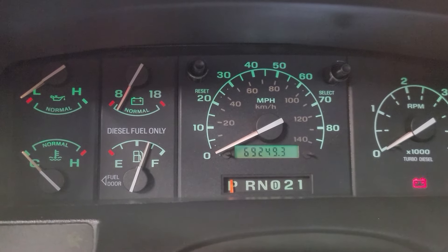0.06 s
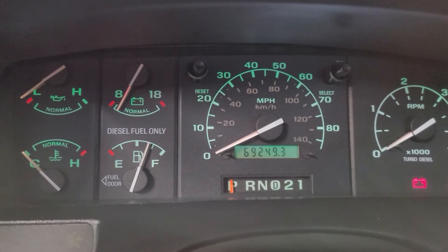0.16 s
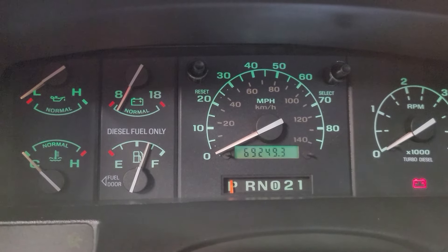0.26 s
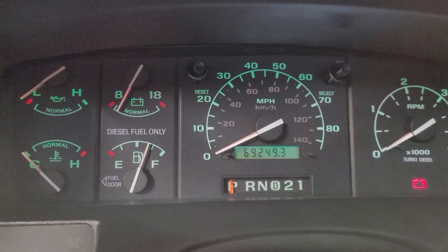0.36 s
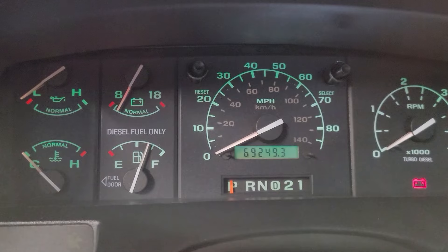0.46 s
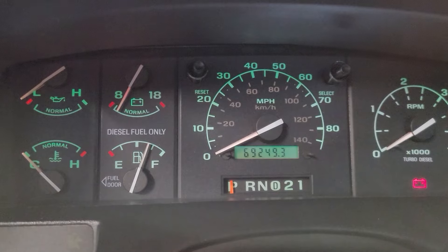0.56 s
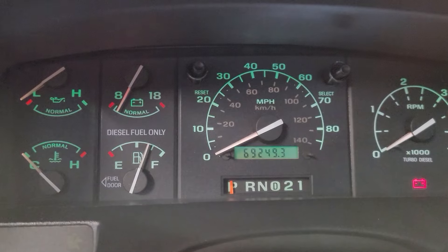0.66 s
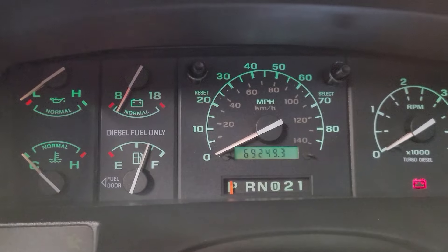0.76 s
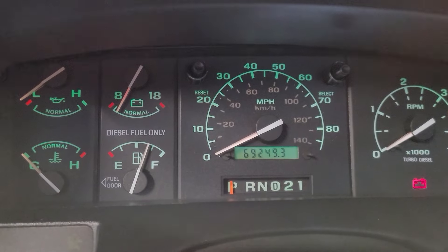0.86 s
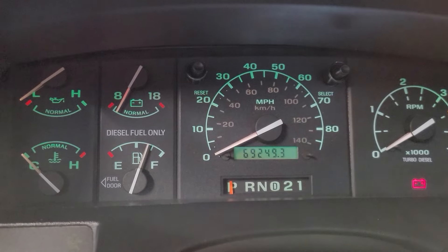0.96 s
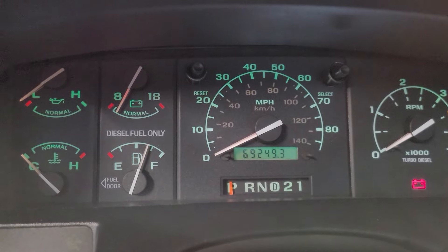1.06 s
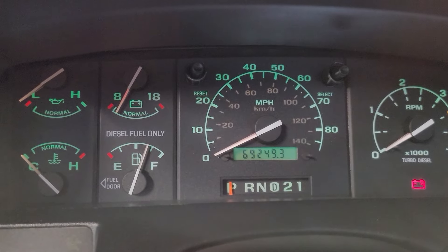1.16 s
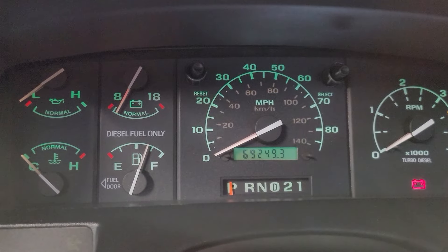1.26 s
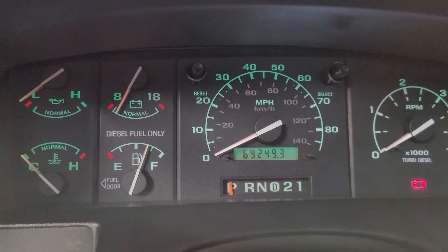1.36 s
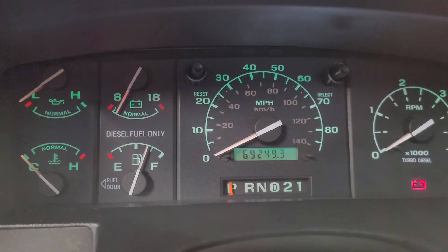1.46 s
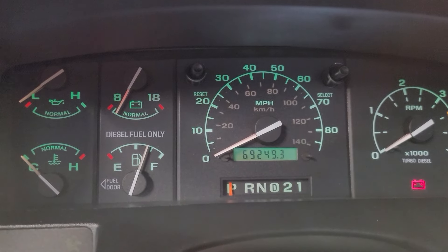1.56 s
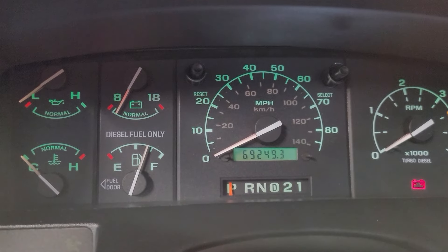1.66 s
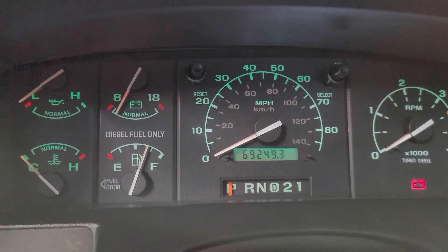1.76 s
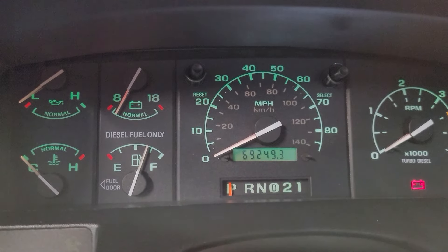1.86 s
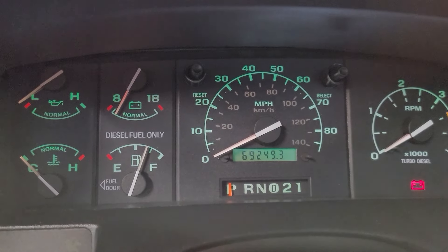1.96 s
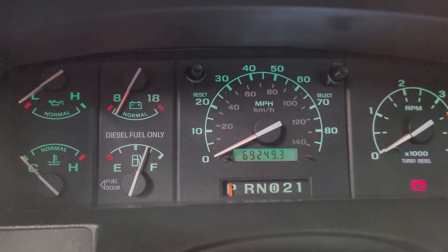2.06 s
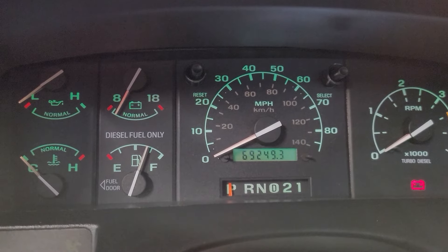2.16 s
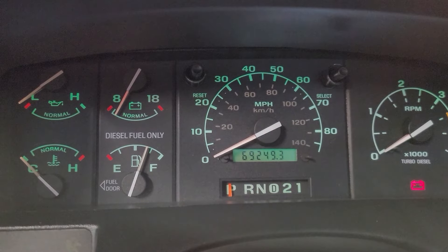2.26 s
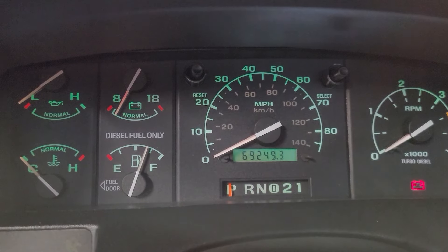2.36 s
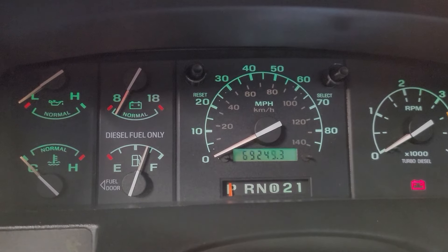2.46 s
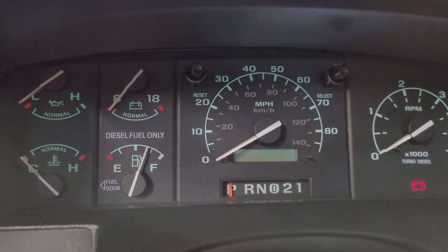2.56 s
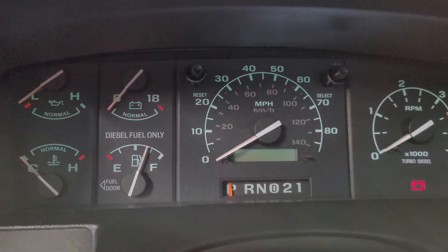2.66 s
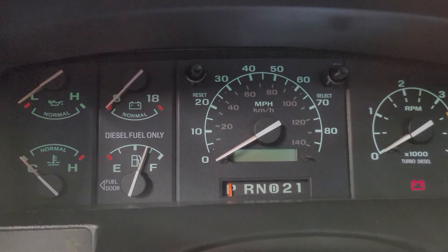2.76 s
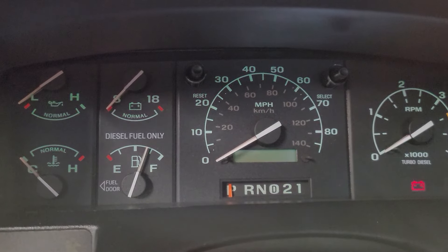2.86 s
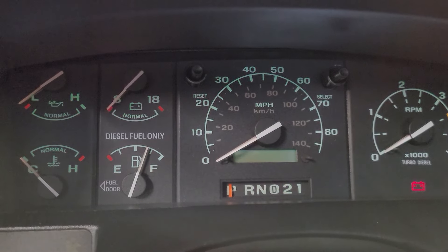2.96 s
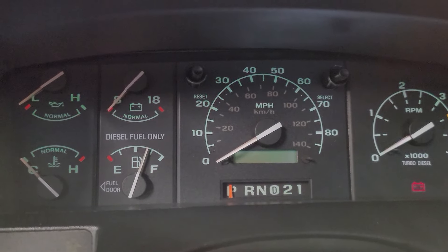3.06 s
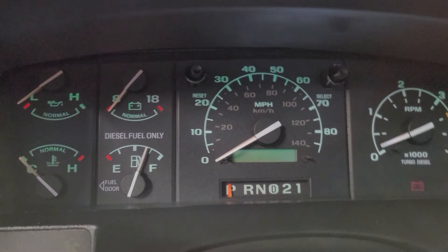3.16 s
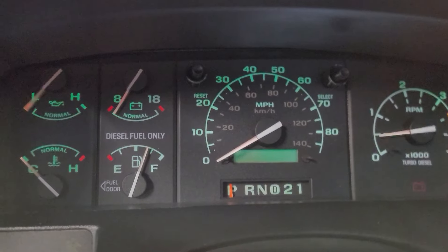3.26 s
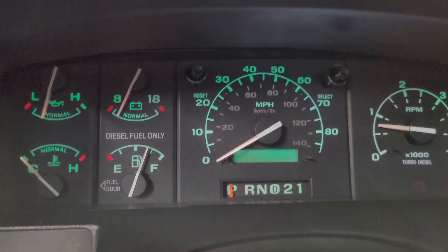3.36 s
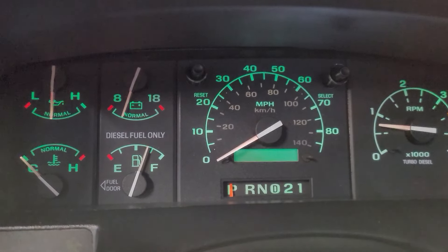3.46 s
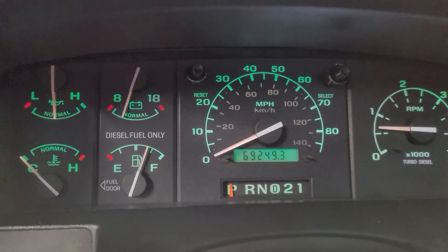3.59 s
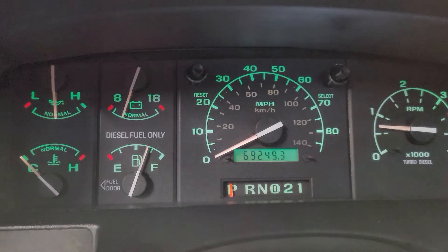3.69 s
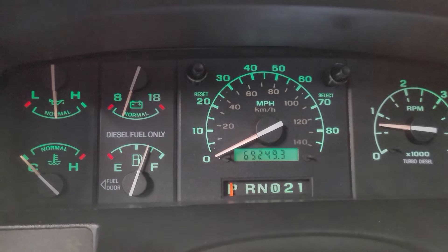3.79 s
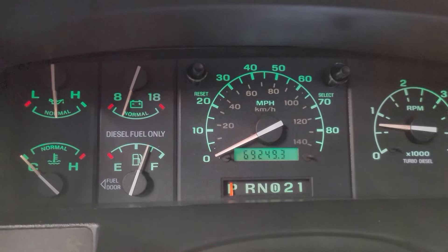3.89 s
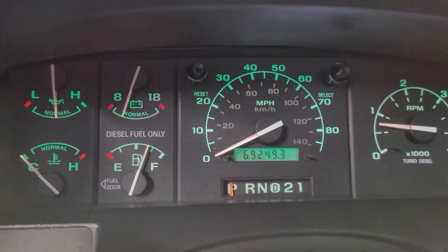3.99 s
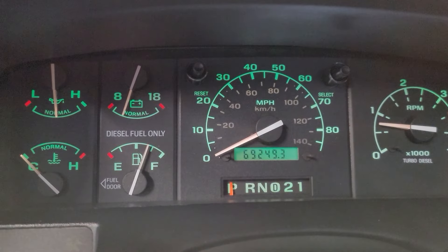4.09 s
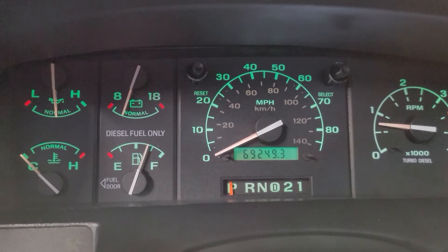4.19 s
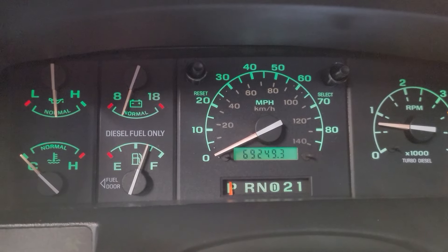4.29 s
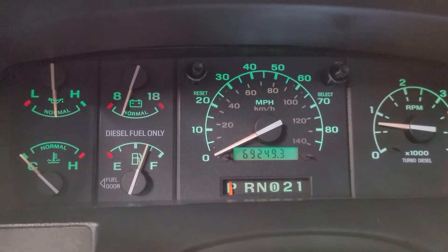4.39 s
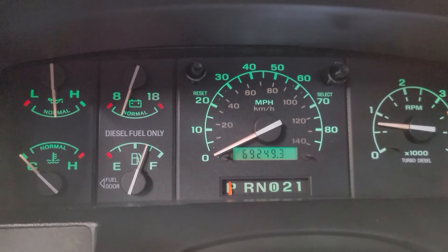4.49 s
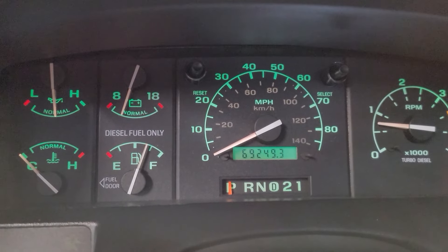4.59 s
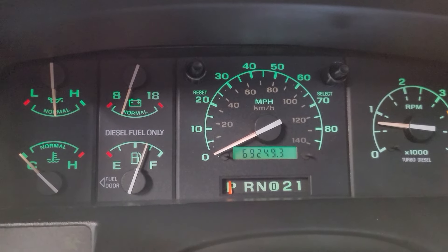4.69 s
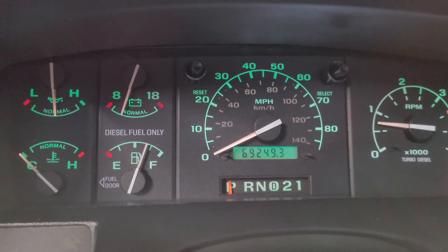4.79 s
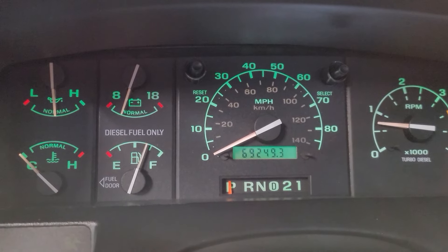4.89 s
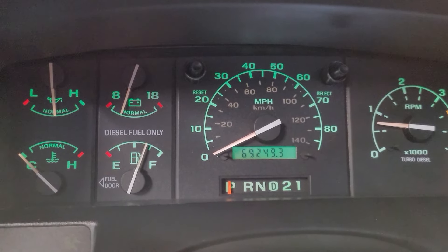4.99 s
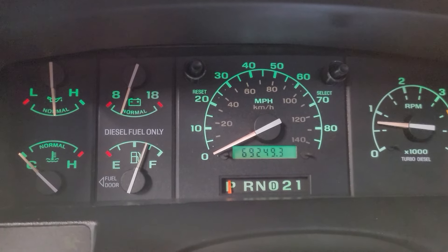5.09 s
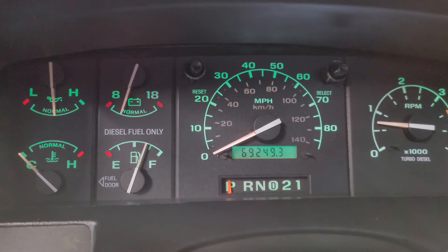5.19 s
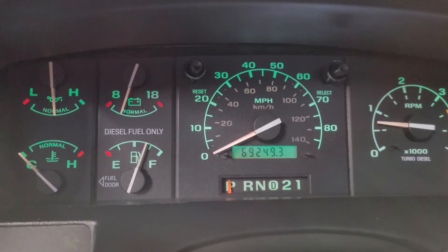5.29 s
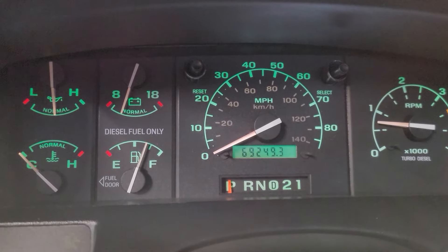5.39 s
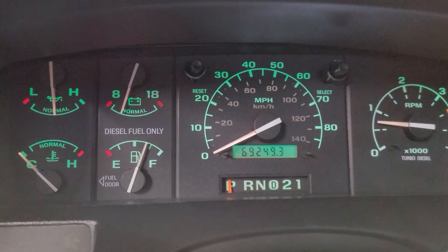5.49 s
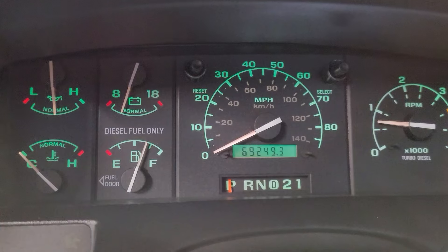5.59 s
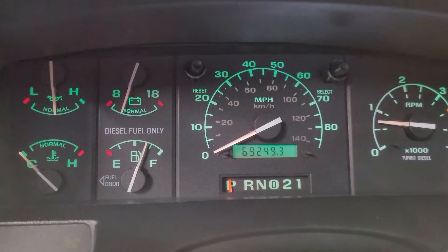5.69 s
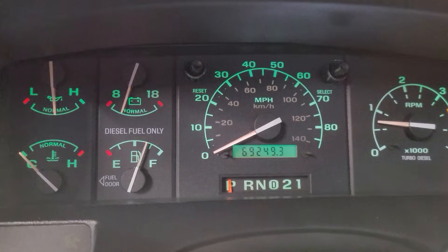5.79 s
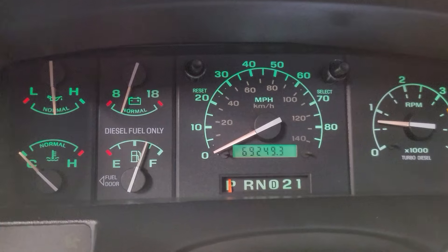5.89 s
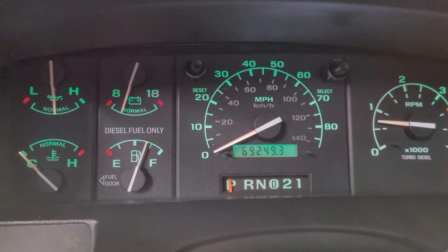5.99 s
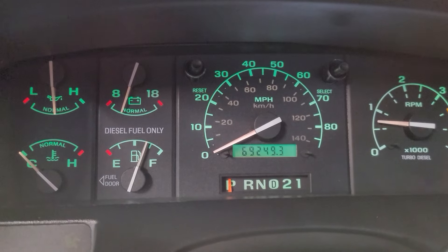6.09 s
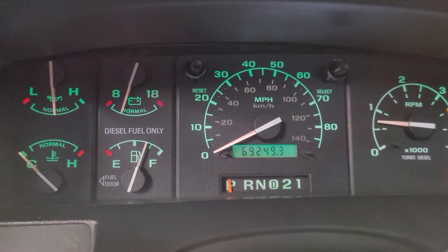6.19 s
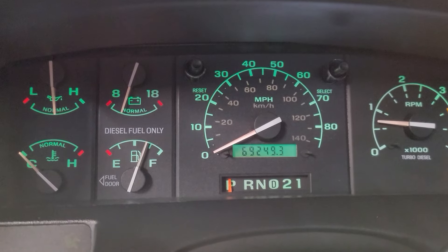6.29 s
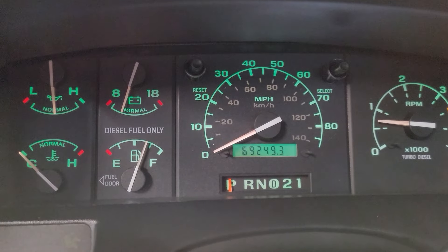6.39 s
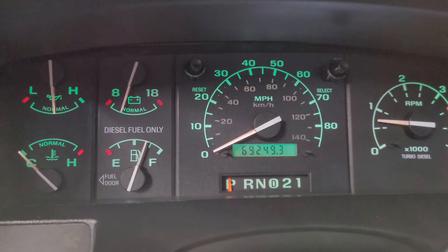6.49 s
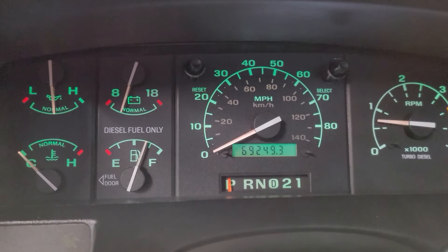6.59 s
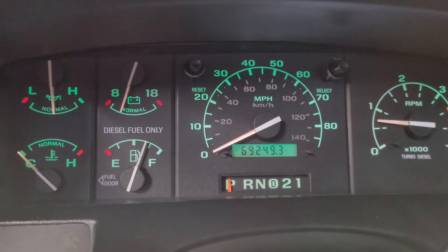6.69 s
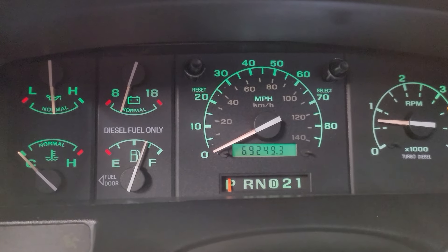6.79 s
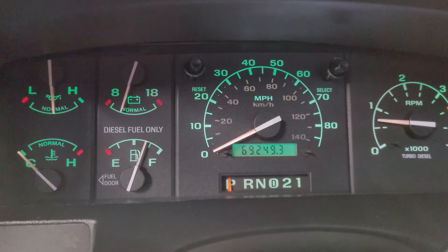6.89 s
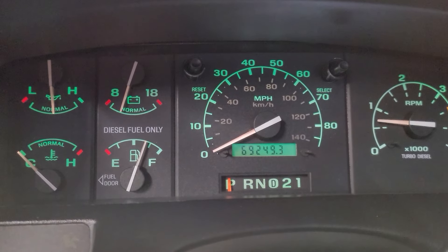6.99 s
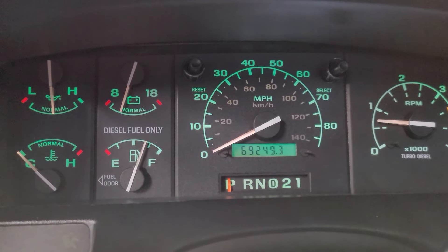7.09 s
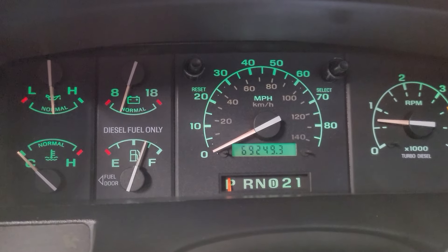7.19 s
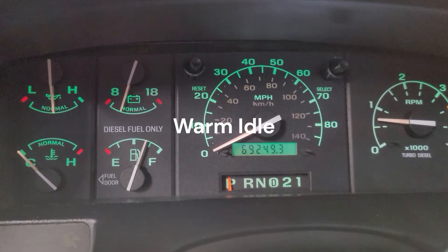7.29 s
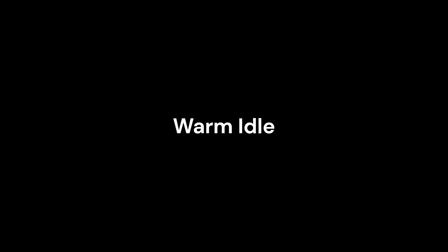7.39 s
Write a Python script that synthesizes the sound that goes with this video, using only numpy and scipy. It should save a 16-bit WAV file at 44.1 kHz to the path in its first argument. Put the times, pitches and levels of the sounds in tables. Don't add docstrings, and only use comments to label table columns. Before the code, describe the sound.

Keys jingle in a quiet truck cab, the ignition clicks, a starter groans briefly, and a big diesel catches, flares and settles into a clattering idle.

```python
import sys
import numpy as np
from scipy import signal
from scipy.fft import rfft, irfft
from scipy.io import wavfile
from scipy.ndimage import uniform_filter1d

SR = 44100
rng = np.random.default_rng(int(sys.argv[2]) if len(sys.argv) > 2 else 0)


def gain_from_db(level_db):
    decades = np.asarray(level_db, float) / 20
    return 10 ** decades


def generate_wav(signal):
    frames = np.transpose(np.atleast_2d(signal))
    scaled = np.clip(frames, -1, 1) * 32767
    pcm = np.round(scaled).astype(np.int16)
    wavfile.write(sys.argv[1], SR, pcm)


N = 328545
CYLINDERS = 8
# (frequency [Hz], correlation [-1..1])
HUSH_SAME = [(60, 0.95), (130, 1), (290, 0.42), (640, 0.62), (1410, -0.28), (3100, -0.38), (6820, 0.35),
             (15000, -0.97)]


def read(points, hz):
    f, value = np.transpose(points)
    return np.interp(np.log(hz + 1), np.log(f + 1), value)


def evened(x, t0=4.5, t1=7.0):
    return x / np.sqrt(np.mean(x[..., int(t0 * SR):int(t1 * SR)] ** 2))


def add(mix, s, sound, lean_db):
    part = mix[:, round(s * SR):][:, :sound.shape[-1]]
    sides = gain_from_db(lean_db / 2 * np.array([[1], [-1]]))
    part += (sound * sides)[..., :part.shape[1]]


def noise(spectrum, same, patchy_db, size, peaks=()):
    # (frequency [Hz], left minus right [dB])
    tilt = [(60, -1), (150, 5), (380, 1), (950, 3), (2380, 2.5), (5980, 0.5), (15000, -2.5)]
    frames, hz = 4 * N // size + 5, np.fft.rfftfreq(size, 1 / SR)
    a, b, c, d, patches = rng.standard_normal((frames, len(hz), 5)).T
    patches = uniform_filter1d(uniform_filter1d(patches, size=6, axis=0), size=8, axis=1)
    like = np.clip(read(same, hz), -1, 1)[:, None]
    left = a + 1j * b
    right = like * left + np.sqrt(1 - like ** 2) * (c + 1j * d)
    lean_db = read(tilt, hz)[:, None] / 2 * np.array([1, -1])[:, None, None]
    colour_db = read(spectrum, hz)
    for f, width, db in peaks:
        colour_db = colour_db + db / (1 + (2 * (hz - f) / width) ** 2)
    z = np.array([left, right]) * gain_from_db(colour_db[:, None] + lean_db + patchy_db * patches / patches.std())
    return evened(signal.istft(z, nperseg=size, noverlap=3 * size // 4)[1][:, :N])


def crank():
    # (time [s], firing rate [Hz])
    run_up = [
        (2.46, 3.3),
        (2.55, 16.2),
        (3.028, 16.4),
        (3.102, 39),
        (3.201, 41),
        (3.303, 58),
        (3.452, 57),
        (3.599, 52),
    ]
    # (time [s], firing rate [Hz])
    idling = [(3.72, 49.86), (4.3, 49.43), (4.9, 48.75), (5.5, 48.08), (6.1, 47.77), (6.7, 47.34),
              (7.35, 46.57)]
    cycle_start_s = 3.828
    rate = np.interp(np.arange(N) / SR, *np.transpose(run_up + idling))
    firings = np.cumsum(rate) / SR
    return rate, firings - firings[round(cycle_start_s * SR)]


def orders(rate, firings, uneven, step=32):
    # (multiple of the four-stroke cycle [count], level [dB])
    shaft = [(3, -47), (4, -54), (6, -50), (7, -50), (8, -26), (9, -49), (10, -44), (11, -44), (12, -48),
             (14, -40), (15, -47), (16, -34), (21, -51), (23, -49), (24, -46), (26, -46), (27, -47),
             (28, -47), (30, -51), (31, -50), (32, -43), (34, -50), (37, -53), (38, -47), (39, -47)]
    cab_hz, cab_width_hz, cab_db = 187.7, 3.97, 11
    turns = firings[::step] / CYLINDERS
    out = np.zeros((2, N // step + 1))
    for k, db in shaft:
        wobble = uniform_filter1d(rng.standard_normal((2, len(turns))), size=260, axis=1)
        wobble = (wobble[0] + 1j * wobble[1]) / wobble.std()
        off = (k * rate[::step] / CYLINDERS - cab_hz) / cab_width_hz
        share = uneven[::step] * (.16 if k % CYLINDERS == 0 else .9)
        waver = (1 + share * wobble) / np.sqrt(1 + 2 * share ** 2)
        tone = waver * np.exp(2j * np.pi * (k * turns + rng.random()))
        out[int(k > 11)] += gain_from_db(db + cab_db / (1 + off ** 2)) * tone.real
    boom, body = signal.resample_poly(out, step, 1, axis=1)[:, :N]
    return evened(boom), evened(body)


def knocks(firings, scatter_db=1.3, jitter_s=.0003, detune=.005, spread=.09):
    # (crank position [firings], panel frequency [Hz], level [dB],
    # left minus right [dB])
    blows = [(0.0, 1270, -48.5, 13), (.15, 1380, -52, 8), (0.1875, 624, -49, 4), (0.8125, 1141, -51, 7),
             (0.875, 1485, -53, 2), (1.75, 500, -43.5, -1), (2.0, 1507, -55, 3), (2.125, 990, -50, 7),
             (2.8125, 490, -44, 0), (3.125, 1916, -57, -2), (3.1, 2433, -55, 3), (3.1875, 947, -53, 1),
             (3.75, 1550, -56, 3), (4.4375, 2971, -58, 8), (4.85, 1250, -45, 12), (5.3, 970, -48, 8),
             (4.625, 2196, -57, 0), (5.0625, 2734, -61, -2), (5.125, 1141, -45.5, 7), (5.6875, 473, -49, 0),
             (5.9375, 624, -48, 4), (6.375, 1981, -64, 6), (6.8125, 1162, -49, 6), (6.8125, 1593, -52, 10),
             (1.2, 400, -48, 1),
        (3.3, 610, -47, 2),
             (.8, 1700, -55, 4), (1.5, 900, -52, 4), (1.75, 2700, -59, 2), (1.8, 1760, -55, 3),
               (2.85, 2420, -58, 3), (2.95, 1690, -55, 3), (3.8, 1950, -57, 0), (4.65, 1290, -48, 10),
               (6.05, 1330, -53, 8), (7.4, 2850, -60, 3)]
    out, t = np.zeros((2, N)), np.arange(1800) / SR
    cycles = np.arange(-4, 22) * CYLINDERS
    for place, hz, db, lean_db in blows:
        chance = rng.standard_normal((len(cycles), 3))
        peak_s = .0036 + 1.5 / hz
        times = np.interp(cycles + place, firings, np.arange(N) / SR)
        times = times - 1.312 * peak_s + jitter_s * chance[:, 0]
        shape = t / peak_s * np.exp(1 - t / peak_s)
        sides = rng.uniform(-1.52, 1.0, (2, 1))
        for s, size, tune in zip(times, chance[:, 1], chance[:, 2]):
            ring = np.sin(2 * np.pi * hz * (1 + detune * tune) * t + sides)
            for way in (-1, 1.4):
                ring += .3 * np.sin(2 * np.pi * hz * (1 + way * spread) * t + way * size - sides)
            add(out, s, gain_from_db(db + scatter_db * size) * shape * ring, lean_db)
    return evened(out)


def repeating(hiss, firings, size=7400):
    out = np.zeros_like(hiss)
    for shift in (0, .5):
        place = (firings / CYLINDERS + shift) % 1
        out += np.sin(np.pi * place) * hiss[:, (size * (place + 4 * shift + 1)).astype(int)]
    return out


def engine():
    # (time [s], effort [dB])
    effort = [(2.452, -24), (2.464, 1.5), (2.512, 1.5), (2.654, -4.5), (2.786, -3), (2.944, -5.5),
              (2.986, 0), (3.045, -9.5), (3.068, 4), (3.244, 8), (3.316, 5.5), (3.392, 1.5), (3.456, -3),
              (3.658, 4.5), (3.734, -2), (3.85, 0.3), (4.1, -1.17), (7.3, -1.5)]
    # (firing rate [Hz], boom [dB])
    boom_by_speed = [(4, -46), (18, -12.5), (40, -2), (46.6, -8.5), (47.8, -3.5), (49.4, 0.5), (52, -6.5),
                     (58, 0.5)]
    # (time [s], half-length [s], boom [dB], body [dB])
    lurches = [(2.52, 0.012, -5, 11), (2.6, 0.06, 5.5, 7.5), (2.792, 0.055, 3, -10), (2.897, 0.023, -4, 0),
               (2.953, 0.022, 8.5, 11), (3.04, 0.031, 6, 2), (3.064, 0.018, -8, 6), (3.18, 0.043, 5, 0.5),
               (3.241, 0.016, 13.5, 0.5), (3.318, 0.043, 8.5, -3), (3.664, 0.031, -10.5, 1.5),
               (3.85, 0.018, -11, 2), (3.99, 0.023, 3.5, 2), (4.091, 0.023, -6.5, 1)]
    # (frequency [Hz], density [dB per Hz])
    rumble_colour = [(8.8, -24), (15, -21.5), (38, 3.5), (65, -6), (109, -5.5), (136, -3), (195, -7),
                     (270, -13), (312, -21), (386, -12), (420, -15), (550, -60.5), (920, -120)]
    roar_colour = [(150, -21.5), (250, -8.5), (307, -11), (446, -14), (501, -3.5), (654, -7), (741, -10),
                   (1260, -9.5), (2100, -29.5), (2730, -61.5), (4620, -120)]
    clatter_colour = [(880, -33.5), (1500, -2.5), (1840, -10.0), (2380, -6.5), (3110, -10.5), (4520, -15.5),
                      (5140, -25.5), (6710, -25.5), (8920, -39.5), (11200, -36.0), (15800, -37.5),
                      (16300, -78.5)]
    # (frequency [Hz], width [Hz], level [dB])
    trim = [(399, 12, 11), (501, 14, 12), (630, 20, 7), (970, 20, 8), (1137, 12, 13), (1655, 16, 6),
            (1590, 200, 3)]
    # (frequency [Hz], correlation [-1..1])
    likeness = [(60, 0.86), (130, 0.93), (290, 0.61), (640, 0.9), (1410, 0.096), (3100, 0.097),
                (6800, 0.051), (15000, 0.078)]
    # (frequency [Hz], phase lead [rad])
    port_lead = [(0, 0), (600, -.3), (1210, 2.8), (1980, 5.4), (4050, 12.5), (20000, 12.5)]

    t = np.arange(N) / SR
    effort_db = np.interp(t, *np.transpose(effort))
    rate, firings = crank()
    firing = np.clip((rate - 20) / 22, 0, 1)
    rock_db, heave_db = sum(np.outer(dbs, np.exp(-((t - s) / half) ** 2)) for s, half, *dbs in lurches)

    boom_db = -22 + 0.66 * effort_db + read(boom_by_speed, rate) + rock_db
    body_db = -30 + 0.53 * effort_db - 9 * (1 - firing) + heave_db
    knock_db = -38.5 + effort_db - 0.87 * (1 - firing)
    clatter_db = -53.5 + firing * effort_db + (1 - firing) * (1.5 + 0.51 * effort_db)

    uneven = 0.54 * (1 + 4 * np.clip((4.05 - t) / .45, 0, 1))
    boom, body = orders(rate, firings, uneven)
    settled = np.clip((t - 3.3) / 0.6, .25, 1) * firing
    shaken = np.clip((3.9 - t) / .5, 0, 1) * firing
    rumble = noise(rumble_colour, likeness, 1.2, size=4096)
    low = signal.sosfiltfilt(signal.butter(N=3, Wn=70, fs=SR, output="sos"), rumble)

    puffs = 1 + 0.047 * firing * np.cos(2 * np.pi * (firings - .1))
    puffs = puffs + 0.029 * np.cos(2 * np.pi * (firings / CYLINDERS - .2))
    luck = rng.standard_normal(400)[firings.astype(int) % 400]
    puffs = puffs * gain_from_db(.3 * firing * np.maximum(effort_db, 0) * uniform_filter1d(luck, size=150))
    grind = uniform_filter1d(rng.standard_normal(N), size=800)
    puffs = puffs * gain_from_db(1.3 * (1 - firing) * (grind / grind.std() - .4))

    out = gain_from_db(boom_db) * (firing * boom + (0.17 + 0.94 * (1 - firing)) * evened(low))
    out += gain_from_db(body_db) * (1.084 * firing * body + (0.5 + 0.47 * (1 - firing)) * evened(rumble - low))
    roar = noise(roar_colour, likeness, 0.7, size=4096, peaks=trim)
    locked = .22 * settled ** 2
    roar = np.sqrt(1 - locked) * roar + np.sqrt(locked) * repeating(roar, firings)
    out += gain_from_db(knock_db + .3) * (.7 * settled * knocks(firings) + .76 * puffs * roar)
    clatter = noise(clatter_colour, likeness, 1.2, size=512)
    treble = signal.butter(N=4, Wn=5200, btype="high", fs=SR, output="sos")
    fizz = signal.sosfilt(treble, clatter)
    out += gain_from_db(clatter_db + 5.5) * puffs * (clatter + 0.89 * shaken * fizz)
    out += gain_from_db(body_db) * .5 * shaken * evened(rumble - low)

    lead = np.interp(np.fft.rfftfreq(N, 1 / SR), *np.transpose(port_lead))
    out[0] = irfft(rfft(out[0]) * np.exp(1j * lead), N)
    return out * np.clip((t - effort[0][0]) / 0.0019, 0, 1)


def starter(chatter=.2, waver=.015):
    # (start [s], length [s], first pitch [Hz], last pitch [Hz], level [dB])
    groans = [(2.675, .13, 255, 205, -26), (2.79, .065, 362, 340, -35), (2.84, .08, 284, 229, -32.5),
              (2.55, .06, 495, 512, -41), (2.595, .075, 555, 635, -41), (2.66, .065, 645, 590, -41),
              (2.72, .07, 615, 590, -40), (2.805, .07, 680, 700, -43), (2.76, .07, 200, 215, -38),
              (2.85, .08, 511, 500, -43), (2.96, .07, 585, 595, -48), (2.93, .05, 760, 750, -43.5)]
    glide_share, peak_share, ends_db = 0.329, 0.32, -17.5
    out = np.zeros((2, N))
    for s, length, first_hz, last_hz, db in groans:
        u = np.arange(0, length, 1 / SR) / length
        teeth = uniform_filter1d(rng.standard_normal((2, len(u))), size=350, axis=1)
        teeth = teeth / teeth.std()
        pitch_hz = last_hz + (first_hz - last_hz) * np.exp(-(u / glide_share) ** 2)
        turn = 2 * np.pi * np.cumsum(pitch_hz * (1 + waver * teeth[0])) / SR
        tone = np.sin(turn) + 0.032 * np.sin(2 * turn) + 0.067 * np.sin(3 * turn)
        level_db = db + np.interp(u, [0, peak_share, 1], [ends_db, 0, ends_db])
        envelope = gain_from_db(level_db) * (1 + chatter * teeth[1]) * signal.windows.tukey(len(u), .2)
        add(out, s, np.sqrt(2) * envelope * tone, 1.5)
    return out


def keys(fob_db=-13, rub=0.24, damp_db=-14):
    # (frequency [Hz], level [dB], decay factor [x t60], group [0 main, 1 middle, 2
    key_modes = [(5048, 0, 1.12, 0), (5200, -13, .5, 0), (4300, -11, .5, 3), (3150, -6, .6, 3),
                 (3984, -14, .6, 3), (7100, -18, .9, 3), (8064, -19, 1.3, 3), (8940, -17, .6, 1),
                 (11470, -3, 1.25, 1), (11570, -8, 1.0, 1), (11690, -6, .5, 1), (12230, -19, 1.2, 1),
                 (15080, -9, .4, 2), (15295, 0, .55, 2), (15195, -11, .6, 2),
                 (10390, -22, .7, 1), (12660, -15, .4, 1), (13240, -24, .5, 2), (14750, -20, .4, 2)]
    # (time [s], peak level [dB], t60 [s], top group [dB], middle group [dB])
    jingles = [(0.9747, -28, 0.14, -7, -6.5), (1.118, -37, 0.051, -21, -12), (1.198, -19, 0.2, -9, -21.5),
               (1.2371, -12, 0.016, -21, -13), (1.249, -24.5, 0.019, -18, -12.5),
               (1.3696, -53.5, 0.022, -11.5, -19), (2.33, -51.5, 0.1, -14, -7),
               (2.388, -39, 0.016, -32, -22), (3.486, -64.5, 0.41, -0.5, 7), (3.5787, -27.5, 0.13, 6, 12),
               (3.603, -41, 0.084, -6.5, 4.5), (3.7599, -22, 0.18, 5, -4), (3.809, -47, 0.12, 4, 10.5),
               (3.9122, -39, 0.064, -8, -10)]
    modes = key_modes
    out, t = np.zeros((2, N)), np.arange(11000) / SR
    gaps = np.diff([row[0] for row in jingles] + [N / SR])
    for (s, db, t60, top_db, middle_db), gap in zip(jingles, gaps):
        group_db = (0, middle_db, top_db, min(middle_db + 2.0, fob_db))
        ring = np.zeros((2, len(t)))
        for (hz, mode_db, slow, group), (left, right, size) in zip(modes, rng.random((len(modes), 3))):
            level_db = mode_db + group_db[group] + 8 * (size - .5) * (mode_db < -5)
            level_db = level_db - 11 * (group == 2) * np.array([[.5], [-.5]])
            rattle = uniform_filter1d(rng.standard_normal((2, len(t))), size=200, axis=1)
            rubbing = 1 + rub * rattle / rattle.std()
            fall = t / (t60 * slow)
            decay = gain_from_db(level_db - 49.4 * fall + damp_db * (2 * fall) ** 2)
            phase = np.array([[left], [left + 0.27 * right + 0.082 * (hz > 10000)]])
            ring += rubbing * decay * np.sin(2 * np.pi * (hz * t + phase))
        choke = np.clip((gap - t) / .025, .06, 1) if gap < .045 else 1
        lean_db = -13 if s < 3.4 else -1.5
        add(out, s, gain_from_db(db) * ring * choke * (1 - np.exp(-t / 0.00092)), lean_db)
    return out


def snaps(rows, lean_db, order):
    out, t = np.zeros((2, N)), np.arange(12000) / SR
    for s, db, t60, hz, thud_db in rows:
        grit = rng.standard_normal((len(t), 3)).T
        band = signal.butter(N=order, Wn=[hz / 2.06, hz * 1.22], btype="band", fs=SR, output="sos")
        crack = signal.sosfilt(band, 5.1 * grit[0] + 0.099 * grit[1:])
        crack *= (0.31 * gain_from_db(-60 * t / t60) + 0.15 * gain_from_db(-60 * t / 0.0018)) / crack.std()
        thud = np.sin(2 * np.pi * 95 * t) + .5 * np.sin(2 * np.pi * 215 * t)
        thud = gain_from_db(thud_db - 60 * t / 0.066) * thud * (1 - np.exp(-t / 0.00022))
        add(out, s, gain_from_db(db) * (crack + thud), lean_db)
    return out


def pings(rows, lean_db, rise_s=0.00094):
    out, t = np.zeros((2, N)), np.arange(9000) / SR
    for (s, hz, db, t60), (a, b, apart) in zip(rows, rng.random((len(rows), 3))):
        side = np.array([[0], [.25 * b]])
        pair = np.sin(2 * np.pi * (hz * t + a + side))
        twin_hz = hz * (1.015 + .02 * apart)
        pair = pair + .5 * min(1, 2500 / hz) * np.sin(2 * np.pi * (twin_hz * t + b - side))
        envelope = gain_from_db(db - 60 * t / t60) * (1 - np.exp(-t / rise_s))
        add(out, s, envelope * pair, lean_db * (hz > 300))
    return out


def dash(x, wet_db=-16, t60=.06):
    t = np.arange(4000) / SR
    tail = rng.standard_normal((2, len(t))) * gain_from_db(-60 * t / t60) * (t > .001)
    return x + gain_from_db(wet_db) * signal.oaconvolve(x, tail / np.linalg.norm(tail[0]), axes=1)[:, :N]


def rustle():
    # (peak time [s], level [dB], approach [s per 10 dB], fade [s per 10 dB])
    moves = [
        (0, -95, .05, 0.056),
        (.44, -69, 0.055, 0.15),
        (.7, -68.5, 0.34, 0.34),
        (1.0, -62, 0.049, 0.16),
        (1.118, -55, 0.011, 0.014),
        (1.197, -56.5, 0.017, .01),
        (1.231, -50, 0.02, 0.034),
        (1.29, -69.5, .1, 0.083),
        (2.25, -75, 0.19, 0.22),
        (2.369, -48, .03, 0.04),
    ]
    # (frequency [Hz], density [dB per Hz])
    cloth = [(150, -30), (400, -0.5), (900, -5), (2000, -8.5), (4500, -7), (7000, -13.5), (9500, -28.5),
             (12000, -16.5), (15700, -14.5), (16300, -49.5)]
    t = np.arange(N) / SR
    flicker = uniform_filter1d(rng.standard_normal(N), size=300)
    swells = [db - 10 * np.maximum((s - t) / rise, (t - s) / fade) for s, db, rise, fade in moves]
    level_db = np.max(swells, axis=0) + 2.5 * flicker / flicker.std()
    return gain_from_db(level_db) * noise(cloth, HUSH_SAME, 2.2, size=512)


def cab():
    # (frequency [Hz], level [dB])
    pump = [(979.8, -86), (1965, -87), (2945, -94), (3924, -92)]
    # (frequency [Hz], density [dB per Hz])
    hush = [(20, -15.5), (86, -10), (160, -18.5), (212, -7.5), (270, -29), (480, -28.5), (900, -49),
            (4060, -48.5), (7500, -60), (10300, -58.5), (12500, -56.5), (15800, -47), (16300, -86)]
    t = np.arange(N) / SR
    whine = 0
    for hz, db in pump:
        sway_db = 2 * np.sin(2 * np.pi * (2.5 * t + rng.random()))
        sway_db = sway_db + 2.5 * np.sin(2 * np.pi * 7.3 * t + 3 * np.sin(5 * t))
        tone = np.sin(2 * np.pi * (hz * t + rng.random((2, 1))))
        whine = whine + np.sqrt(2) * gain_from_db(db - 1 + sway_db) * tone
    return gain_from_db(-60) * noise(hush, HUSH_SAME, 1.2, size=2048) + whine


def scene():
    # (time [s], peak level [dB], t60 [s], centre [Hz], thud [dB])
    taps = [(.004, -65, 0.22, 990, -20), (0.03, -66, 0.35, 900, -3), (0.4496, -38, 0.1, 1780, -1),
            (0.9748, -30, 0.076, 4230, -23), (0.9763, -43, 0.1, 13600, -30.5),
            (1.202, -35.5, 0.17, 13900, -43.5), (1.118, -51, 0.14, 3683, -28.5),
            (1.201, -48, 0.11, 3540, -25.5), (1.2183, -35, 0.13, 6670, -34),
            (1.224, -57.5, 0.17, 1180, -25.5), (1.249, -40.5, 0.063, 3070, -15),
            (1.371, -54.5, 0.065, 5120, -31.5), (1.371, -65.5, 0.055, 13000, -33),
            (2.33, -52, 0.065, 6200, -17), (2.3452, -32, 0.069, 4850, -17), (2.3669, -39, 0.072, 2240, -27),
            (3.5778, -31, 0.13, 7250, -22), (3.758, -38, 0.052, 8430, -36.5),
            (3.5775, -33.5, 0.14, 14200, -47), (3.756, -40.5, 0.21, 14200, -34),
            (3.91, -51.5, 0.11, 13960, -42)]
    jolts = [(2.457, -53, 0.23, 1200, -20), (2.4653, -37, 0.18, 2000, -13), (2.552, -36, 0.083, 4060, -18),
             (2.553, -43.5, .08, 10000, -30), (2.945, -43.5, .05, 800, 14.5),
             (3.055, -26.5, 0.077, 3900, -19), (3.055, -34.5, 0.065, 12300, -31),
             (3.1136, -22.5, 0.064, 2860, 0.5), (3.116, -43.5, 0.081, 12400, -28),
             (3.124, -39.5, .06, 9000, -32), (3.142, -44, .12, 12100, -31),
             (3.155, -42.5, .06, 3000, -21.5), (3.185, -29, .06, 2400, -27), (3.259, -35, .06, 2500, -25),
             (3.326, -34, 0.078, 8500, -25), (3.217, -25, 0.066, 2004, -21), (3.232, -26, 0.096, 2310, -11),
             (3.316, -34.5, 0.12, 7360, 7), (3.315, -41.5, 0.105, 13000, -27),
             (3.483, -34, 0.026, 6030, -10)]
    # (time [s], frequency [Hz], peak level
    # [dB], t60 [s])
    key_and_lock_rings = [(0.974, 4190, -30.5, 0.04), (0.977, 3157, -33.5, 0.068), (.99, 2220, -64.5, 0.37),
                          (0, 900, -66, 0.27), (.03, 1000, -67, 0.16), (.977, 8150, -51, 0.31),
                          (.976, 9000, -53, 0.072), (1.201, 8920, -39.5, .07), (3.759, 9370, -41, 0.14),
                          (3.76, 7030, -48.5, 0.2), (.98, 4330, -52.5, 0.2), (2.232, 2150, -74, .1),
                          (2.25, 3000, -72, .12), (2.272, 2970, -67, 0.19), (2.285, 1100, -60, .05),
                          (2.308, 1300, -59, .05), (2.3455, 2100, -43, 0.091), (2.346, 4290, -43, 0.033),
                          (2.3455, 6660, -40.5, 0.04), (2.365, 1990, -42, 0.063), (2.39, 4900, -65, 0.64),
                          (3.483, 2020, -31.5, 0.026), (3.482, 4230, -28.5, 0.021), (3.484, 6600, -40, 0.03),
                          (3.762, 3150, -38, 0.101), (3.484, 8750, -58, 0.044)]
    clanks = [(2.457, 322, -33.5, 0.068), (2.467, 1050, -37.5, 0.089), (2.501, 140, -25, 0.051),
              (2.522, 210, -27.5, 0.072), (2.556, 235, -26.5, 0.2), (2.562, 62, -27, .15),
              (2.613, 130, -27, 0.062), (2.456, 1106, -48, 0.083), (2.46, 526, -40, 0.13),
              (2.462, 1930, -40.5, 0.14), (2.515, 556, -36, .08), (2.625, 966, -48.5, 0.28),
              (2.635, 1285, -45, 0.2), (2.809, 1426, -50, 0.31), (2.814, 1016, -44, 0.12),
              (3.055, 2050, -32, 0.043), (3.053, 3090, -38, 0.054), (3.056, 3560, -34, 0.028),
              (3.075, 970, -42, 0.056), (3.116, 1463, -26.5, 0.043), (3.114, 2180, -30, 0.042),
              (3.15, 1320, -48.5, .08), (3.062, 131, -21, 0.096), (3.168, 205, -20.5, .08),
              (3.21, 155, -16.5, 0.1), (3.234, 134, -14, 0.13), (3.402, 193, -26, .08),
              (3.222, 2150, -32.5, .07), (3.245, 1860, -33.5, 0.058), (3.265, 1700, -53, 0.11),
              (3.31, 1120, -33, 0.08), (3.32, 2040, -33, 0.075), (3.4188, 1212, -35.5, 0.046)]
    mix = engine() + starter() + rustle() + cab()
    lock = snaps(taps, 8, order=1) + pings(key_and_lock_rings, -2.5)
    shake = snaps(jolts, 11.5, order=2) + pings(clanks, 5.6)
    return mix + dash(keys() + lock + shake)


def low_pass(x):
    return signal.sosfilt(signal.butter(12, 16700, fs=SR, output="sos"), x)


def record(dry):
    cut_s = 7.3298
    notch_hz, notch_width_hz, notch_leak = 9700, 1900, 0.54
    after = np.arange(N) / SR - cut_s
    top = signal.cheby2(N=12, rs=45, Wn=16150, fs=SR, output="sos")
    dry = signal.sosfilt(top, dry)
    notched = signal.lfilter(*signal.iirnotch(notch_hz, notch_hz / notch_width_hz, fs=SR), dry)
    dry = notched * (1 - notch_leak) + notch_leak * dry
    dry = .7 * np.tanh(dry / .7)
    remnant = gain_from_db(-58 - 320 * np.maximum(after, 0)) * (after < .026) * (after > 0)
    mix = dry * np.clip(-after * SR / 2, 0, 1) + remnant * uniform_filter1d(dry, size=24, axis=1)
    return low_pass(mix)


dry = scene()
out = record(dry)
generate_wav(out)
```